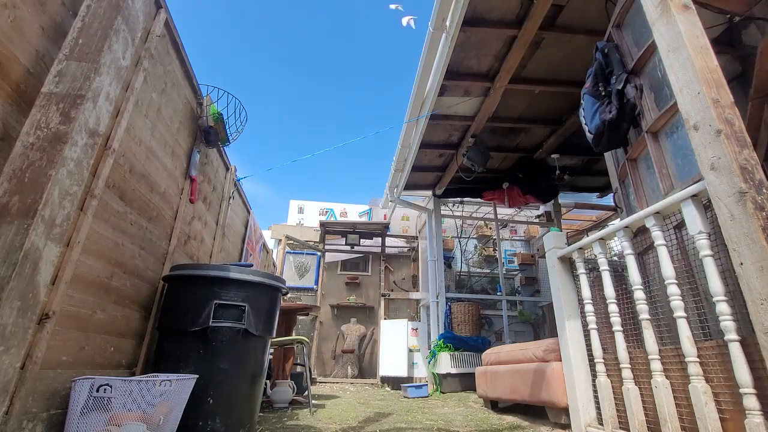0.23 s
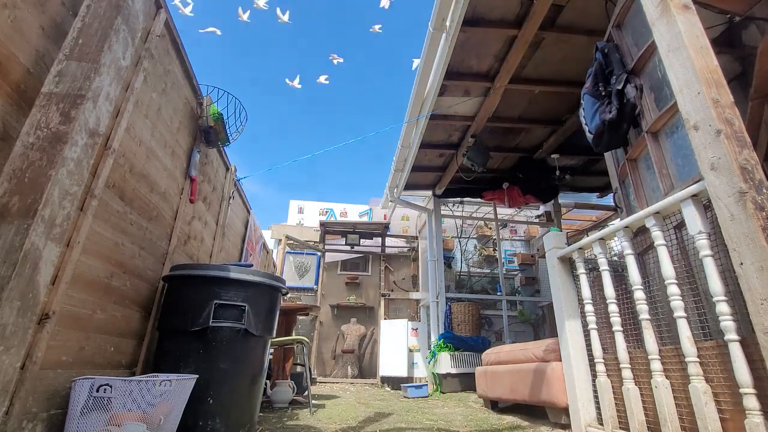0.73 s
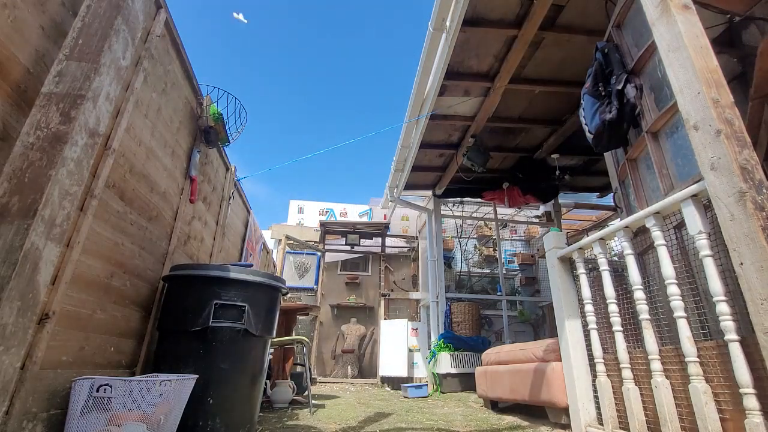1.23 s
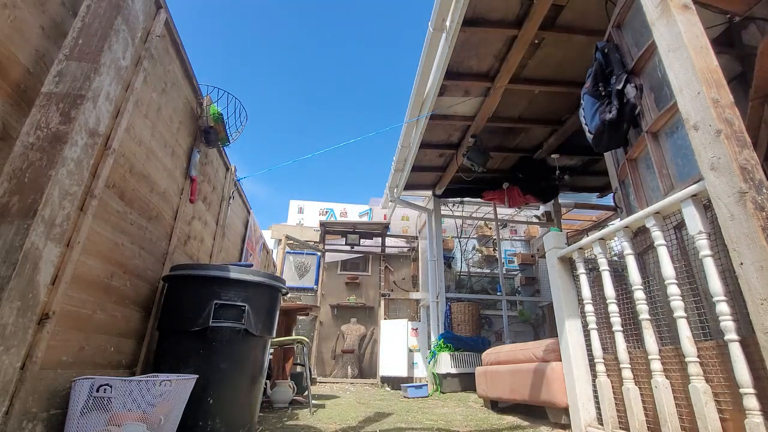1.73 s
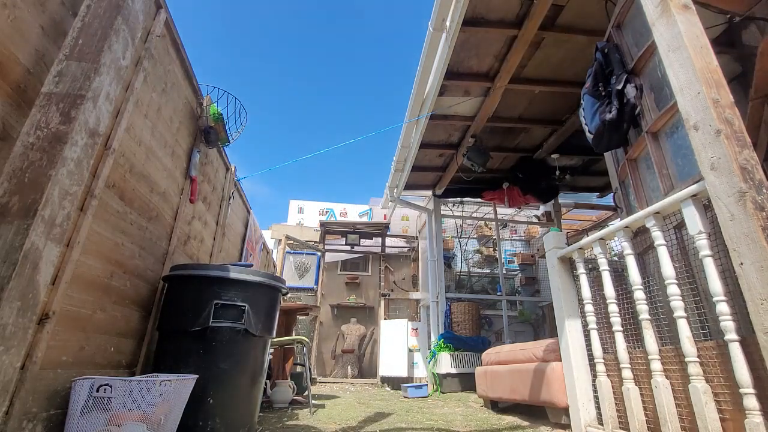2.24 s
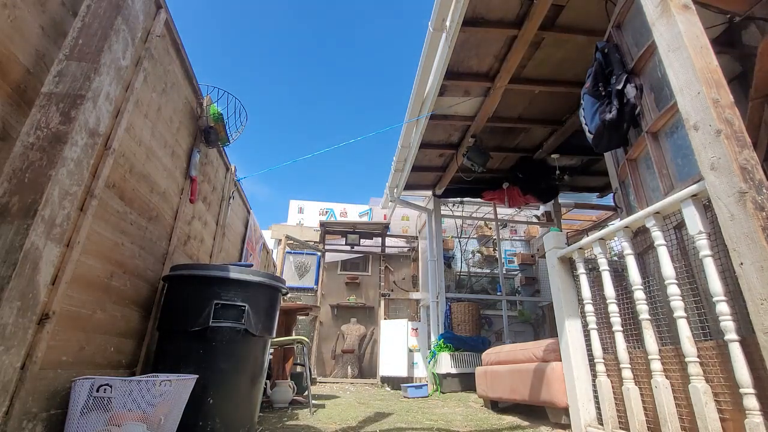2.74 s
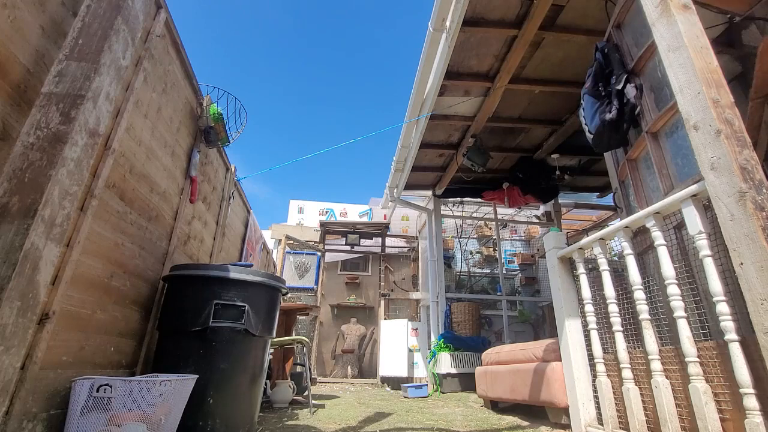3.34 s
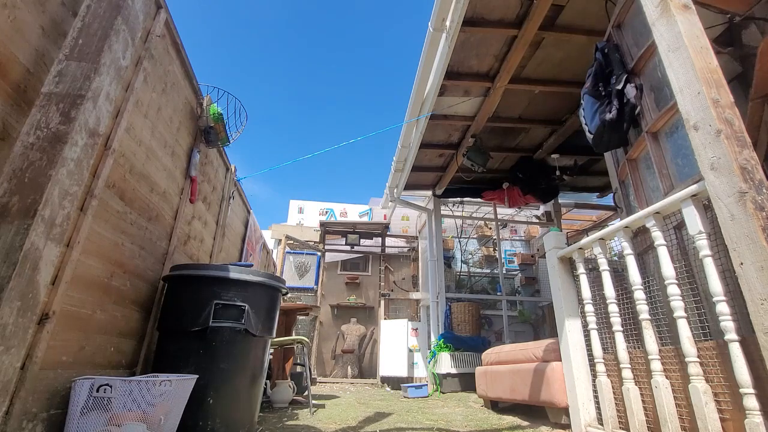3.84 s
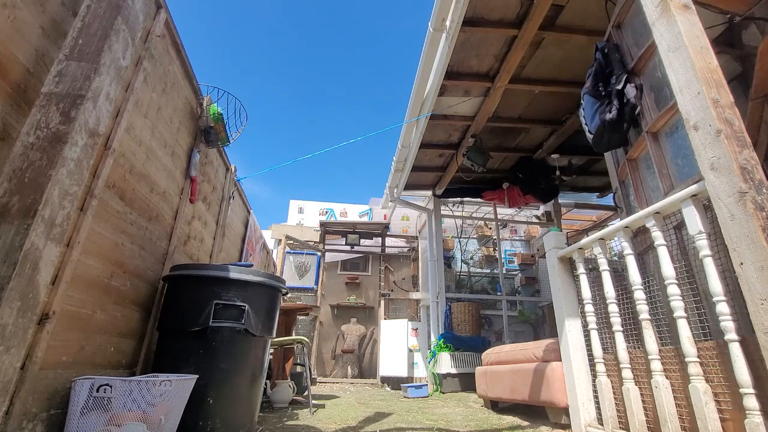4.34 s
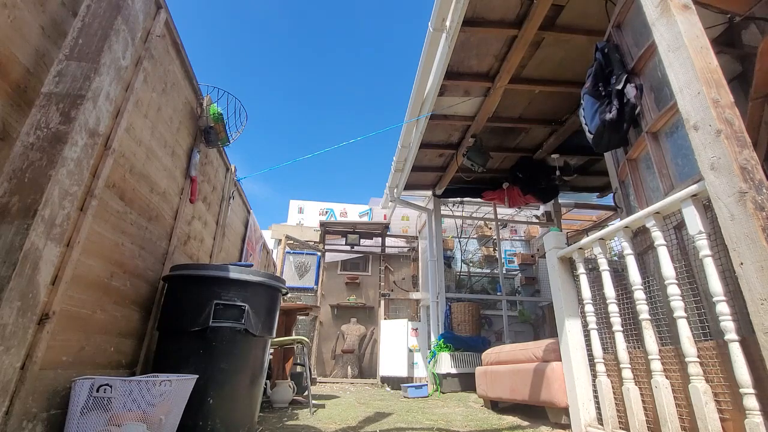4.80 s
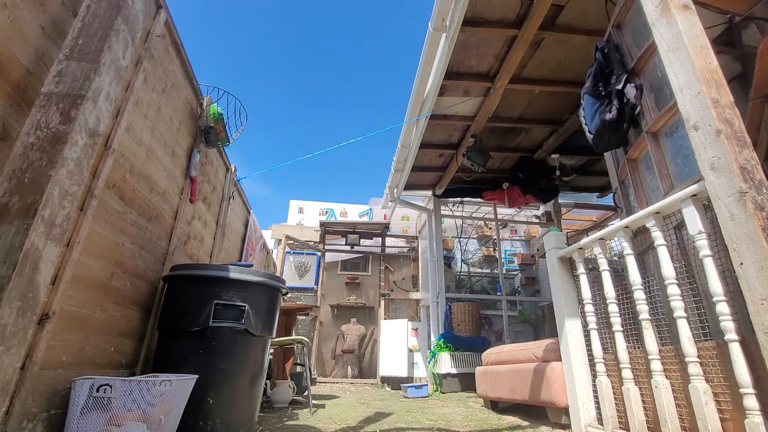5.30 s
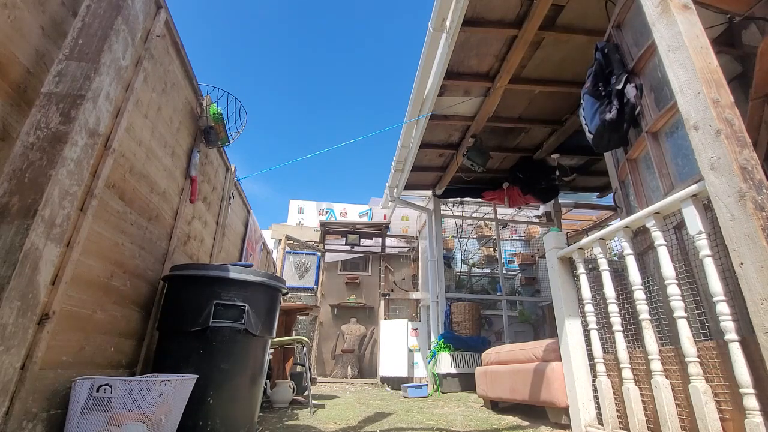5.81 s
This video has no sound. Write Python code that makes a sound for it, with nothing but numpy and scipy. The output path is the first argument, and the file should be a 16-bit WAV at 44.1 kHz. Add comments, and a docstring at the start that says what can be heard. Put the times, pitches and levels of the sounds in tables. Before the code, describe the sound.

Close sparrows give short, bright, slightly raspy chirps in a narrow fenced yard, crowded in the first second and then about one little phrase per second. Pigeon wings flutter overhead at the start, fade to almost nothing, and return near the end with sharp claps. A distant engine drone and traffic rumble lie underneath. Stereo pickup, chirps dry with quick reflections off the fence.

```python
"""Sparrows chirp close by in a narrow fenced yard, while a flock of pigeons circles overhead.
Sparrows: gliding whistles with rasp and side tones, three stock syllables in phrases with single slurs between.
Pigeons: noise pulsed by wingbeats, rushing away in the first second and back at the end, with a few sharp claps.
Behind: a far engine's two-harmonic drone, filtered-noise traffic rumble and a faint hiss."""
import sys
import numpy as np
from scipy import signal
from scipy.fft import rfft, irfft
from scipy.io import wavfile
from scipy.ndimage import uniform_filter1d

SR = 44100
rng = np.random.default_rng(int(sys.argv[2]) if len(sys.argv) > 2 else 0)


def wrap_up_sound(samples):
    """Save the sound to the file named by the first command line argument, as 16-bit audio."""
    columns = np.atleast_2d(samples).T
    # keep every value between -1 and 1, then stretch to whole-number steps
    tamed = np.clip(columns, -1, 1)
    steps = np.round(tamed * 32767).astype(np.int16)
    wavfile.write(sys.argv[1], SR, steps)


N = 267228
TIME = np.arange(N) / SR


def notes():
    """Lists every note sung: stock syllables, each time stretched and transposed a little, and single slurs."""
    # A scratch, a scoop up to a pure whistle, a rasp, a drop. Each row: offset from the main note in seconds,
    # length in seconds, start pitch in Hz, end pitch in Hz, level in dB, rasp 0-1, split into side tones 0-1.
    chirp = [(-.029, .009, 3000, 3080, -11, .75, 0.3), (-.019, 0.017, 3100, 3220, -2.5, 0.03, 0.3),
             (0, .039, 3500, 3170, 0.6, 0, 0), (.037, .019, 3424, 3148, -1.5, .5, 0.4),
             (.056, .026, 3130, 2900, -3, .26, 0.1)]
    # A soft low flick, a jump to a high pure note and back. Each row: offset in seconds, length in seconds,
    # start pitch in Hz, end pitch in Hz, level in dB, rasp 0-1, split 0-1.
    hiccup = [(-.018, 0.021, 3184, 2890, -7, .04, .02), (0, .027, 3869, 3482, -0.2, .03, 0),
              (.028, 0.017, 3310, 2930, 0, .22, 0.0007)]
    # Side tones, a dip, a steep fall. Each row: offset in seconds, length in seconds,
    # start pitch in Hz, end pitch in Hz, level in dB, rasp 0-1, split 0-1.
    twang = [(0, .02, 3170, 3180, 2, .2, .75), (.027, .012, 2828, 2900, 3.5, 0.12, .1),
             (.042, .026, 3700, 3020, .5, .16, .06)]
    # Chirps sung. Each row: main note in seconds, level in dB, length factor, pitch factor.
    chirps = [(.513, -25.5, .8, 1), (1.324, -25, 1.1, 1), (2.255, -23, .95, 1), (3.146, -24, 1.08, 1),
              (4.089, -25.5, 1.03, 1.005), (4.873, -24.5, 1, .995), (5.643, -25, .97, .99)]
    # Hiccups sung. Each row: main note in seconds, level in dB, length factor, pitch factor.
    hiccups = [(.14, -27.5, 1.45, 1), (1.276, -28, 0.93, 1.01), (2.172, -29.5, 0.99, 1),
               (3.072, -29, 1.055, 0.99), (4.968, -33.5, 1.23, 1.01), (5.843, -30, 1.06, .97)]
    # Twangs sung. Each row: main note in seconds, level in dB, length factor, pitch factor.
    twangs = [(.213, -28.5, 1.64, 1.005), (3.24, -30, 1.03, 1.015), (5.034, -32.5, 1, .99),
              (5.908, -28.5, 0.88, 0.97)]
    # Single slurred notes. Each row: start in seconds, length in seconds, start pitch in Hz,
    # end pitch in Hz, level in dB, rasp 0-1.
    slurs = [(.001, 0.023, 3417, 3250, -28.5, 0.11), (0.021, 0.029, 3350, 2780, -27.5, 0.61),
             (.177, .04, 3600, 2856, -30, .4), (0.188, .025, 3837, 3723, -25, .07),
             (0.247, 0.036, 3535, 3192, -32, 0.5), (0.48, 0.03, 2892, 3060, -31.5, 0.8),
             (.562, .036, 2730, 2546, -29, 0.32), (0.594, 0.015, 3464, 3075, -31.5, .24),
             (0.606, 0.037, 2873, 2726, -30.5, 0.12), (0.649, 0.1, 2140, 2150, -40.5, 0.4),
             (.679, .028, 5410, 4875, -36, .08), (0.76, .03, 3495, 3186, -33.5, 0.06),
             (2.227, .02, 3015, 3310, -28.5, 0.5), (2.861, 0.04, 2917, 1950, -47.5, 0.76),
             (2.896, .041, 1818, 2586, -40.5, 0.2), (2.935, .024, 3550, 3265, -36.5, .01),
             (2.97, .013, 1480, 1664, -34, 0.01), (4.495, 0.016, 3610, 3578, -37, 0.02),
             (4.516, 0.017, 3928, 3677, -30, 0.01), (4.525, 0.04, 3260, 2737, -33.5, 0.08),
             (4.558, 0.032, 3803, 3505, -30.5, 0.01), (4.593, 0.0264, 2464, 1773, -42.5, 0.43),
             (5.959, .069, 3035, 2483, -36, .25)]
    split_per_rasp = 0.45  # slurs only
    sung = [(*slur, rasp, split_per_rasp * rasp) for *slur, rasp in slurs]
    for syllable, times in (chirp, chirps), (hiccup, hiccups), (twang, twangs):
        for main_s, db, stretch, pitch in times:
            for after_s, length_s, start_hz, end_hz, note_db, rasp, split in syllable:
                sung.append((main_s + stretch * after_s, stretch * length_s,
                             pitch * start_hz, pitch * end_hz, db + note_db, rasp, split))
    return [note for note in sung if note[0] + note[1] > 0]


def sparrows(jitter_rad=0.45, jitter_hz=1400, buzz_hz=340, buzz_depth_hz=350, flutter=0.94, side_depth=1.2,
             waver=0.011, edge_s=0.0055, scrape_db=-15, least_scrape=0.14, pressing=0.76, loud_db=-24,
             swell_s=0.0052):
    """Gliding whistles; rasp shakes pitch and adds hiss, a split note's level swings at a third of its pitch."""
    # Overtones of the song. Each row: multiple of the pitch, level in dB.
    overtones = [(1, 0.5), (2, -25), (3, -29.5), (4, -32)]
    # Colour of the song on its way from the beak. Each row: frequency in Hz, gain in dB.
    beak = [(800, -18.5), (1500, -11), (2200, -4.5), (3300, 1), (4300, -1), (6000, 3), (7600, 7),
            (8400, -2), (10200, -4.5), (12200, -5), (13500, 3), (15500, 4.5)]
    # Dry hiss of a rasping syrinx. Each row: frequency in Hz, relative density in dB per Hz.
    syrinx_hiss = [(1000, -20.5), (2000, -6.5), (3300, -11), (5000, -1.5), (7600, -2.5), (8400, -14.5),
                   (12200, -11.5), (13500, -8), (15500, -9.5)]
    shake, slow = wander(jitter_hz), wander(260)
    warble_hz = 400 * wander(270)
    song, scrape = np.zeros((2, N))
    buzz = np.sin(2 * np.pi * np.cumsum(buzz_hz * (1 + 0.27 * wander(120))) / SR)
    for start_s, length_s, start_hz, end_hz, db, rasp, split in notes():
        first = max(int((start_s - edge_s / 2) * SR), 0)
        last = int((start_s + length_s + edge_s / 2) * SR)
        span = slice(first, last)
        t = TIME[span] - start_s

        hz = np.interp(t, [0, length_s], [start_hz, end_hz]) * (1 + waver * slow[span])
        hz = hz + np.tanh(2 * rasp) * warble_hz[span] + rasp * buzz_depth_hz * buzz[span]
        phase = 2 * np.pi * (np.cumsum(hz) / SR + rng.random())
        third = np.sin(phase / 3)
        phase = phase + rasp * jitter_rad * shake[span]

        top_gain = gain_of(pressing * (db - loud_db))  # soft notes lose their highest overtones
        tone = np.zeros(len(t))
        for k, tone_db in overtones:
            gain = gain_of(tone_db) * (top_gain if k > 2 else 1)
            tone += gain * np.sin(round(k) * phase)
        tone = tone * (1 + flutter * rasp * buzz[span]) * (1 + side_depth * split * third)

        fade = np.clip(np.minimum(t, length_s - t) / edge_s + 0.5, 0, 1)
        level = gain_of(db) * np.sin(np.pi / 2 * fade) ** 2
        # pure notes need a moment to build up
        level = level * (1 - 0.5 * (1 - rasp) * np.exp(-np.maximum(t, 0) / swell_s))
        song[span] += level * evened(tone)
        scrape[span] += level * (least_scrape + rasp ** 2)
    puffs = evened(coloured(rng.standard_normal(N) * (1 + 0.47 * buzz), syrinx_hiss))
    return coloured(song, beak) + gain_of(scrape_db) * scrape * puffs


def echoes(t60_share, onset_s):
    """Sparse reflections, other ones for each ear, each band dying at its own speed."""
    # Ring of the yard before t60_share scales it. Each row: frequency in Hz, t60 in seconds.
    ring = [(200, .5), (1500, 0.35), (3300, 0.45), (7000, 0.32), (15000, 0.45)]
    taps = rng.choice([-1., 1.], (2, SR)) * (rng.random((2, SR)) < 2500 / SR)  # about 2500 per second
    hz, t, z = signal.stft(taps, SR, nperseg=256)
    t60_s = t60_share * read(ring, hz)[:, None]
    tail = signal.istft(z * gain_of(-60 * t / t60_s), SR, nperseg=256)[1][:, :SR]
    tail = tail * np.clip(TIME[:SR] / onset_s - 0.3, 0, 1)
    return tail / np.linalg.norm(tail, axis=1, keepdims=True)


def yard(x, direct_db, fence_db, tail_db, left_db, lag_s=0.00012):
    """Direct sound reaches the right channel first; fence and porch answer quickly, the houses later."""
    late = irfft(rfft(x) * np.exp(-2j * np.pi * np.fft.rfftfreq(N, 1 / SR) * lag_s), N)
    fence = gain_of(fence_db) * echoes(t60_share=0.37, onset_s=0.0016)
    houses = gain_of(tail_db) * echoes(t60_share=0.82, onset_s=0.042)
    wet = signal.fftconvolve(x[None], fence + houses, axes=1)[:, :N]
    direct = gain_of(direct_db) * np.array([late, x])
    return (direct + wet) * gain_of([[left_db / 2], [-left_db / 2]])


def wingbeats(count, beat_hz, stroke_db):
    """Several birds, each with its own beat, drifting in and out: a sharp downstroke that fades."""
    power = np.zeros(N)
    for _ in range(count):
        bird_hz = beat_hz * rng.uniform(0.8, 1.2) * (1 + 0.054 * wander(0.67))
        turns = np.cumsum(bird_hz) / SR + rng.random()
        power += gain_of(-stroke_db * (turns % 1) + 4.2 * wander(4.5)) ** 2
    return evened(np.sqrt(uniform_filter1d(power, size=200)))


def flock(rush_db=3, feather_db=1.5):
    """Noise pulsed by many wings: pushed air, hissing feathers and a soft whistle, all following nearness."""
    # Nearness of the flock. Each row: time in seconds, level in dB before the layer offsets.
    nearness = [(0.0, -60), (0.44, -56.5), (0.84, -63), (1.79, -74.5), (2.14, -64.5), (2.45, -75.5),
                (2.72, -76), (3.07, -71.5), (3.41, -86.5), (3.93, -88), (5.01, -69), (5.54, -54),
                (6.06, -56)]
    # Air pushed by the wings. Each row: frequency in Hz, relative density in dB per Hz.
    pushed_air = [(150, -1), (300, -10.5), (480, -3), (680, -1), (800, 1.5), (1050, -6), (1400, -4),
                  (2000, -10.5), (4000, -21), (8000, -28.5)]
    # Hiss of the feathers. Each row: frequency in Hz, relative density in dB per Hz.
    feather_hiss = [(800, -19), (1500, 1), (3000, -2), (5500, 0), (7500, 0.5), (8500, -7.5), (12000, -3.5),
                    (15500, -4.5)]
    # Soft whistle of stiff flight feathers. Each row: frequency in Hz, relative density in dB per Hz.
    stiff_feathers = [(450, -41.5), (620, -15), (675, 3.5), (730, -8.5), (850, -22.5), (1100, -37.5)]
    near_db = np.interp(TIME, *np.transpose(nearness))
    beats = wingbeats(count=6, beat_hz=7.9, stroke_db=24.5)
    rush = air(pushed_air) * gain_of(near_db + rush_db) * beats
    whistle = air(stiff_feathers) * gain_of(near_db) * wingbeats(count=3, beat_hz=8.0, stroke_db=14.5)
    feathers = rustle(feather_hiss) * gain_of(near_db + feather_db) * beats
    return rush + whistle + feathers


def wing_strokes(crack_rise_s=0.0024, swish_rise_s=0.0018, thump_rise_s=0.0054):
    """Single wing sounds, from soft rustles to strong strokes: feather crack, swish and slower push of air."""
    # Heavy wing strokes. Each row: start in seconds, swish level in dB, thump level in dB.
    heavy_strokes = [(.533, -45.5, -50), (2.03, -61, -59), (2.873, -52.5, -60), (3.068, -55, -41.5),
                     (5.805, -45, -37.5)]
    # Brighter wing sounds: soft feather rustles near 3.6 s, sharp claps near the end.
    # Each row: start in seconds, crack level in dB, swish level in dB.
    bright_strokes = [(3.535, -57, -79), (3.574, -59.5, -68), (3.649, -59.5, -68), (5.274, -58, -48),
                      (5.337, -52.5, -73), (5.387, -49.5, -44.5), (5.558, -44.5, -57), (5.932, -47, -47),
                      (6.029, -48, -51)]
    # Crack as the feathers meet. Each row: frequency in Hz, relative density in dB per Hz.
    crack_colour = [(1000, -10), (2500, -5.5), (5000, 6.5), (7500, 2), (8500, -2.5), (12000, 1),
                    (14500, -5)]
    # Wing cutting the air. Each row: frequency in Hz, relative density in dB per Hz.
    swish_colour = [(250, -13.5), (520, 1.5), (750, -4.5), (1050, -6), (1600, -1), (2300, -7.5),
                    (5000, -19)]
    # Dull body of a stroke. Each row: frequency in Hz, relative density in dB per Hz.
    thump_colour = [(60, -7), (130, -11.5), (200, -8), (270, 9), (400, -9), (600, -11.5), (1200, -27.5),
                    (3000, -57.5)]
    heavy_crack_db, heavy_fade_s = -4.5, 0.045  # crack relative to swish
    bright_thump_db, bright_fade_s = -63, 0.038
    crack, swish, thump = np.zeros((3, N))
    strokes = [(start_s, swish_db + heavy_crack_db, swish_db, thump_db, heavy_fade_s)
               for start_s, swish_db, thump_db in heavy_strokes]
    strokes += [(start_s, crack_db, swish_db, bright_thump_db, bright_fade_s)
                for start_s, crack_db, swish_db in bright_strokes]
    for start_s, crack_db, swish_db, thump_db, fade_s in strokes:
        span = slice(int(start_s * SR), int((start_s + 0.5) * SR))
        t = TIME[span] - start_s
        layers = ((crack, crack_db, crack_rise_s), (swish, swish_db, swish_rise_s),
                  (thump, thump_db, thump_rise_s))
        for level, db, rise_s in layers:
            decay = np.exp(-np.maximum(t - rise_s, 0) / fade_s)
            level[span] += gain_of(db) * np.clip(t / rise_s, 0, 1) * decay
    return crack * rustle(crack_colour) + swish * rustle(swish_colour) + thump * air(thump_colour)


def rustle(spectrum, grain_db=0.5, grain_hz=220):
    """Feathers sliding over each other: noise in uneven grains."""
    return evened(air(spectrum) * gain_of(grain_db * wander(grain_hz)))


def town(engine_db=-1.5, second_db=-21, traffic_db=8, hiss_db=-70.5, lead_rad=0.61, unsteady_db=1.2,
         unsteady_hz=6):
    """A far engine's uneven two-harmonic drone, leading in the left ear, over traffic rumble and faint hiss."""
    # Engine speed. Each row: time in seconds, firing rate in Hz.
    engine_speed = [(0.0, 57), (1.72, 61), (4.22, 63.5), (5.77, 64), (5.86, 68.5), (6.06, 65.5)]
    # Engine loudness. Each row: time in seconds, level in dB before engine_db.
    engine_level = [(0.0, -43), (0.39, -38), (0.93, -47.5), (1.33, -43.5), (1.72, -47.5), (1.77, -58),
                    (2.24, -42), (2.31, -57.5), (2.55, -55), (2.68, -72), (2.72, -51.5), (3.34, -48),
                    (3.49, -71.5), (3.56, -60), (5.13, -42), (5.67, -51), (6.01, -47.5), (6.06, -53)]
    # Far traffic. Each row: time in seconds, level in dB before traffic_db.
    traffic_level = [(0.0, -61), (1.53, -59.5), (1.82, -66), (2.21, -59.5), (2.63, -67.5), (3.17, -60.5),
                     (3.44, -67.5), (6.06, -52.5)]
    # Traffic colour. Each row: frequency in Hz, relative density in dB per Hz.
    rumble = [(15, -18.5), (30, -10.5), (50, 11), (85, 1.5), (130, 0), (185, -7.5), (225, -3), (265, -5.5),
              (300, -8), (500, -19.5), (800, -26), (1500, -42.5), (3000, -61)]
    # Steady faint hiss. Each row: frequency in Hz, relative density in dB per Hz.
    faint_hiss = [(300, 9), (1000, 3), (2500, -1), (4800, 0), (5800, 3), (7700, 6), (8400, -1), (12000, -1),
                  (15500, 0)]
    hz = np.interp(TIME, *np.transpose(engine_speed))
    phase = 2 * np.pi * np.cumsum(hz) / SR + 0.09 * wander(12) + np.array([[lead_rad], [0]])
    drone = np.sin(phase) + gain_of(second_db) * np.sin(2 * phase)
    drone = drone * gain_of(unsteady_db * wander(unsteady_hz))
    engine = evened(drone) * gain_of(np.interp(TIME, *np.transpose(engine_level)) + engine_db)
    passing_db = np.interp(TIME, *np.transpose(traffic_level)) + traffic_db + 1.2 * wander(5.4)
    traffic = air(rumble) * gain_of(passing_db)
    return (engine + traffic) * gain_of([[-0.6], [0.6]]) + gain_of(hiss_db) * air(faint_hiss)


def air(spectrum):
    """Stereo noise from all around, alike in both ears in the bass, rms 1."""
    # Likeness of the two ears. Each row: frequency in Hz, coherence.
    likeness = [(60, 0.97), (150, .88), (350, 0.78), (700, 0.26), (1400, 0), (3000, 0), (16000, 0.028)]
    a, b = rfft(rng.standard_normal((2, N)))
    same = np.clip(read(likeness, np.fft.rfftfreq(N, 1 / SR)), -1, 1)
    ears = np.array([a, same * a + np.sqrt(1 - same ** 2) * b])
    return evened(coloured(irfft(ears, N), spectrum))


def wander(rate_hz):
    """Smooth random curve of rms 1: noise rolled off steeply above the rate."""
    hz = np.fft.rfftfreq(N, 1 / SR)
    return evened(irfft(rfft(rng.standard_normal(N)) / np.sqrt(1 + (hz / rate_hz) ** 6), N))


def coloured(x, spectrum):
    """Filters by a spectrum in dB."""
    return irfft(rfft(x) * gain_of(read(spectrum, np.fft.rfftfreq(N, 1 / SR))), N)


def read(points, hz):
    """Interpolates a table on a log-frequency axis."""
    f, value = np.transpose(points)
    return np.interp(np.log(hz + 1), np.log(f + 1), value)


def evened(x):
    """Scales to rms 1."""
    return x / np.sqrt(np.mean(x ** 2) + 1e-20)


def gain_of(db):
    """Decibels to amplitude."""
    return 10 ** (np.asarray(db) / 20)


def suppress(x, depth_db=5, open_db=-45, range_db=22, release_db_per_s=120):
    """Mild noise suppressor: treble sinks in quiet moments, stays open briefly after each loud sound."""
    high_pass = signal.butter(2, 2000, "high", fs=SR, output="sos")
    treble = signal.sosfiltfilt(high_pass, x)
    power = abs(uniform_filter1d((treble ** 2).mean(0), size=300))
    level_db = 10 * np.log10(power + 1e-14)
    fall_db = TIME * release_db_per_s
    held_db = np.maximum.accumulate(level_db + fall_db) - fall_db  # instant rise, steady fall
    shut = np.clip((open_db - held_db) / range_db, 0, 1)
    return x - treble * (1 - gain_of(-depth_db * shut))


def scene():
    """Sparrows in the yard, pigeons above it, the town behind."""
    song = yard(sparrows(), direct_db=-3.0, fence_db=0.5, tail_db=-24.5, left_db=1.5)
    return song + flock() + wing_strokes() + town()


def record(dry):
    """Noise suppression, then the recorder's band limit."""
    edge_hz = 15830
    low_pass = signal.firwin(1023, edge_hz, window=("kaiser", 9), fs=SR)
    return signal.oaconvolve(suppress(dry), low_pass[None], "same")


dry = scene()
out = record(dry)
wrap_up_sound(out)
```